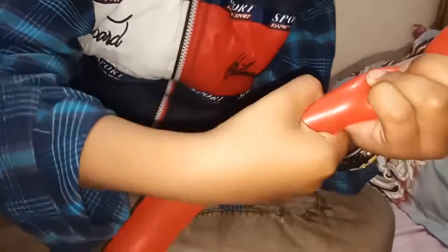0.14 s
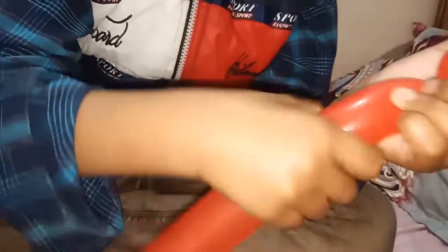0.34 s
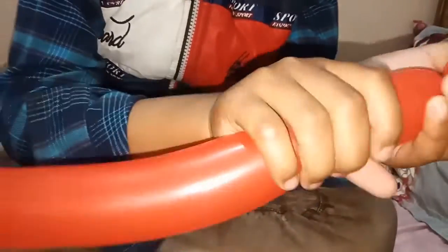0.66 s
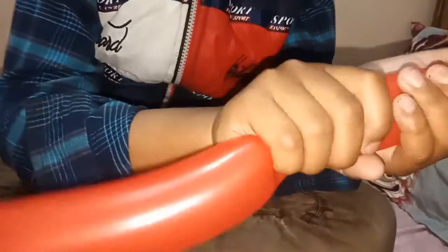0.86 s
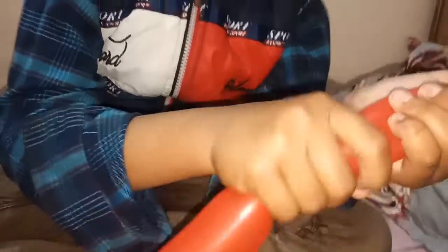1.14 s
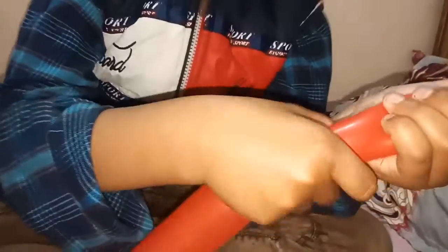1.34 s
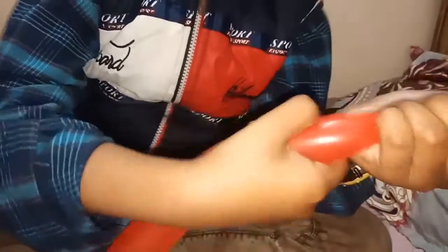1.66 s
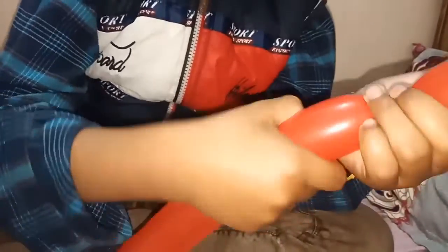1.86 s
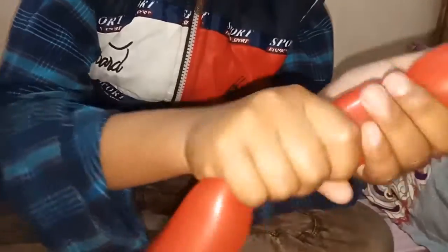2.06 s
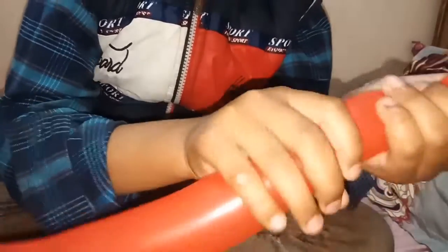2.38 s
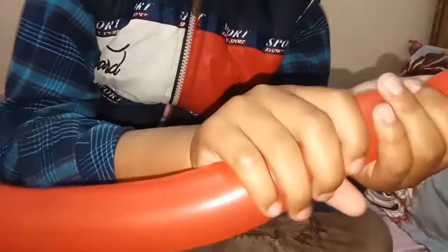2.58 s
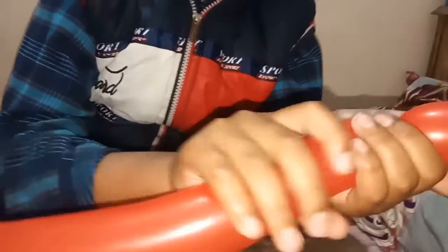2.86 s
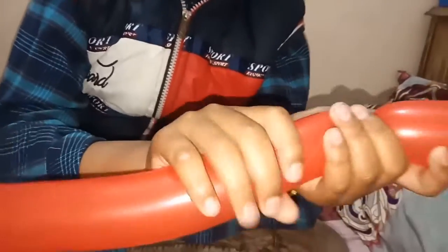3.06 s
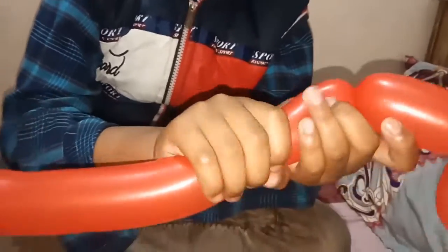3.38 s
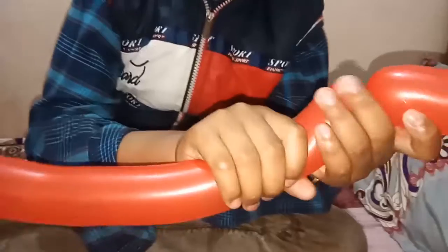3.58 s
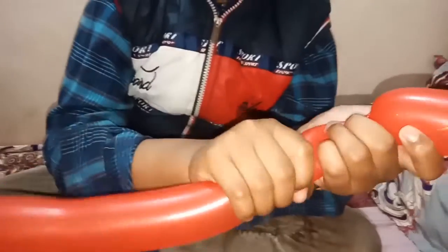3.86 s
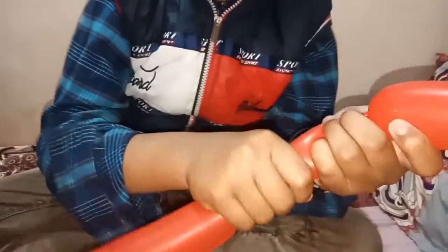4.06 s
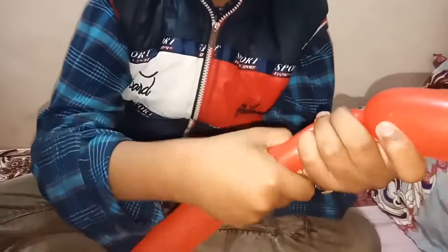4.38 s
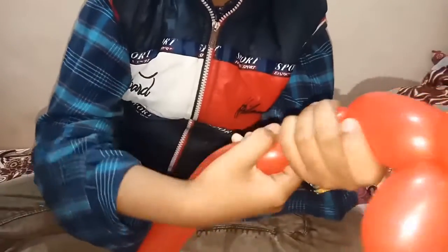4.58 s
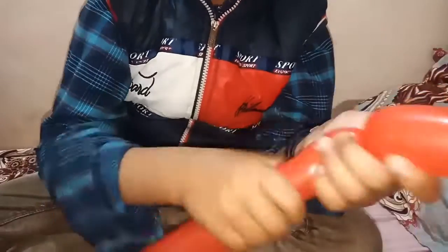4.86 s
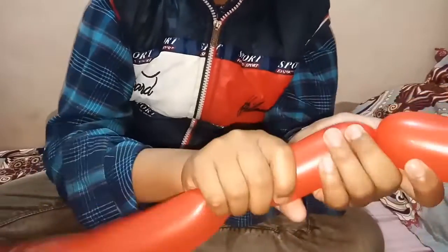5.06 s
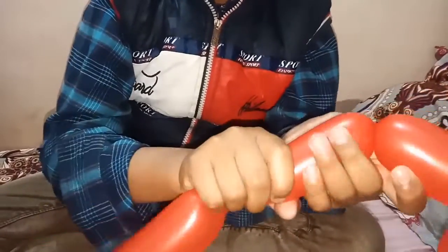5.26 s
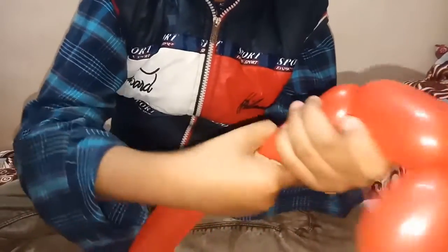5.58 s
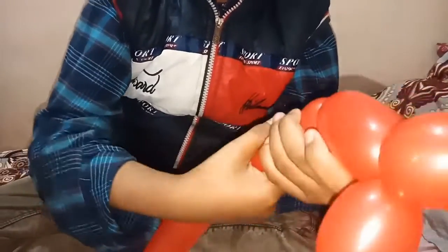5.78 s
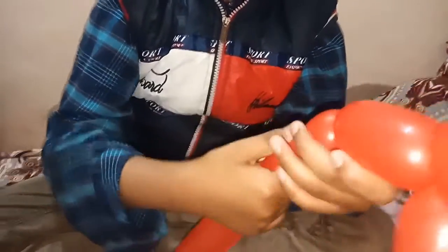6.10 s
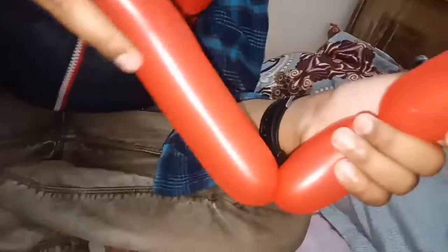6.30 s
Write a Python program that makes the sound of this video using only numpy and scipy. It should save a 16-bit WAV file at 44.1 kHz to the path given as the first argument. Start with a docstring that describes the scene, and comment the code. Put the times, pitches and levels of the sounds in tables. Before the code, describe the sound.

Hands twist a long latex balloon close by: dry cracks, short creaky squeaks, soft crackle and long near-silent gaps in a small furnished room.

```python
"""In a small furnished room, hands twist a latex modelling balloon close to a phone.
The rubber sticks and slips: a lone slip is a dry snap, a slowing run of slips a creak,
an even run a squeak, a scattered run a rub. Tiny stray slips tick and crackle in between.
Each slip is a short damped swing with echoes from the tube and the room.
Underneath are filtered noises: palms brushing, the tube rumbling, the still room and hiss."""
import sys
import numpy as np
from scipy import signal
from scipy.fft import rfft, irfft, next_fast_len
from scipy.io import wavfile
from scipy.ndimage import map_coordinates

SR = 44100
rng = np.random.default_rng(int(sys.argv[2]) if len(sys.argv) > 2 else 0)


def master(y):
    """Save y as 16-bit WAV."""
    cut = np.clip(np.atleast_2d(y).T, -1, 1)
    pcm = np.round(cut * 32767)  # scale
    wavfile.write(sys.argv[1], SR, pcm.astype(np.int16))


N = 283860  # length in samples

# Lone slips: start_s, level_db (peak before trim and echoes), ring_hz
SNAPS = [(0.334, -2, 2550), (0.364, -5, 1650), (0.3665, -6.5, 1600), (0.3751, -3, 2550),
         (0.3815, -11, 1400), (0.405, -18.5, 2020), (0.5419, -31, 970), (0.6169, -27, 1300),
         (0.6258, -24, 1900), (0.6712, -38, 3100), (0.922, -31.5, 3500), (0.9973, -38, 3500),
         (1.1407, -35, 1700), (1.2424, -33, 1300), (1.5161, -36.5, 2500), (1.599, -32, 2100),
         (1.6627, -22.5, 3000), (1.698, -30.5, 750), (1.984, -31.5, 1600), (2.0297, -33, 1610),
         (2.0865, -36, 700), (2.1447, -32.5, 3700), (2.2513, -25.5, 1550), (2.2605, -27.5, 1450),
         (2.282, -9.5, 1860), (2.3095, -6.5, 1900), (2.3305, -5.5, 1800), (2.3473, -8.5, 1500),
         (2.4765, -28, 1600), (2.505, -4, 1870), (2.6789, -27.5, 1700), (2.7878, -33.5, 1700),
         (2.814, -22, 1915), (2.8204, -26.5, 2066), (2.8817, -16, 2100), (3.138, -31.5, 900),
         (3.177, -37.5, 2850), (3.3691, -40.5, 2637), (3.5425, -28.5, 1500), (3.6145, -37.5, 1950),
         (3.743, -38.5, 2520), (4.150, -52.5, 504), (4.553, -19.5, 1500), (4.569, -26.5, 1650),
         (4.6276, -32.5, 1810), (4.9021, -25, 1280), (5.1616, -34.5, 1700), (5.956, -38, 2000),
         (6.1337, -31.5, 1604), (6.2216, -37.5, 3400), (6.3965, -27.5, 1500), (6.4347, -18, 1725)]
# Slowing runs of slips: start_s, length_s, level_db (before the room), first_slips_per_s, first_ring_hz
CREAKS = [(0.361, .075, -36.5, 420, 2200), (1.228, .02, -52, 173, 500), (1.661, 0.047, -36, 229, 1110),
          (2.067, .026, -44, 330, 560), (2.281, .062, -18.5, 520, 2700), (2.311, .052, -18.5, 235, 2300),
          (2.631, .034, -42, 500, 1430), (2.894, .054, -25.5, 448, 2700), (3.110, 0.044, -45, 189, 1750),
          (4.877, .056, -44.5, 410, 1930), (4.903, .055, -42.5, 215, 680), (5.35, 0.031, -51.5, 183, 620),
          (6.122, 0.035, -46.5, 247, 1020), (6.422, 0.038, -39.5, 149, 259)]
# Even runs of slips: start_s, length_s, level_db (before the room), first_pitch_hz, last_pitch_hz, ring_hz
SQUEAKS = [(1.313, 0.029, -50, 1710, 1140, 3000), (1.892, 0.03, -28.5, 770, 880, 1300),
           (1.896, .032, -23.5, 560, 430, 806), (2.491, 0.0094, -35, 923, 760, 1000),
           (2.898, .045, -27, 490, 419.6, 770), (3.780, 0.23, -71, 903, 1003, 1000),
           (4.293, 0.12, -69.5, 590, 579, 700), (5.071, 0.035, -51.5, 460, 520, 1200),
           (5.532, 0.063, -56, 712, 1066, 1790)]
# Fingers sliding over the skin: start_s, rise_s, fall_s, level_db (before the room), ring_hz
RUBS = [(0.079, 0.033, .12, -67, 4010), (0.567, 0.0089, 0.069, -50, 1700),
        (1.229, 0.0085, 0.089, -65, 2940), (1.647, 0.0091, 0.034, -43.5, 3150),
        (1.930, 0.014, 0.069, -51, 1700), (2.826, 0.083, .025, -43, 1800), (3.534, .02, 0.069, -52, 1730),
        (4.440, .15, 0.023, -50.5, 2400), (4.782, 0.062, 0.018, -39.5, 2000),
        (5.060, 0.022, 0.042, -53.5, 2250), (5.400, .15, .24, -63.5, 3200), (5.951, 0.014, 0.02, -47, 1860),
        (5.975, 0.04, 0.08, -54, 1456), (6.392, 0.049, .02, -37, 1450)]
# How busy the hands are: time_s, level_db (before each layer's trim)
HAND_LEVELS = [(0.0, -65.5), (0.37, -64), (0.51, -62), (0.68, -61), (0.98, -64.5), (1.94, -61.5),
               (2.46, -55), (2.64, -66.5), (3.01, -55.5), (3.21, -63.5), (4.28, -67.5), (4.87, -63.5),
               (4.97, -59.5), (5.19, -64), (5.61, -62), (6.4, -72.5)]
# How strongly the handled tube rumbles: time_s, level_db (before trim)
RUMBLE_LEVELS = [(0.0, -70), (0.23, -66), (2.26, -72.5), (2.37, -59), (2.42, -72.5), (4.72, -65.5),
                 (5.35, -58.5), (5.78, -62.5), (5.92, -48.5), (5.95, -61), (6.36, -69), (6.4, -64)]
# Colour of the palms' brushing: frequency_hz, relative_level_db (per Hz)
BRUSH_COLOUR = [(60, -30), (200, -3.5), (700, -4.5), (1600, -4.5), (2600, -9.5), (3800, -11), (4400, -18.5),
                (5200, -31), (6500, -30.5), (9000, -42.5)]
# Colour of the tube's rumble: frequency_hz, relative_level_db (per Hz)
RUMBLE_COLOUR = [(20, -30), (50, -23.5), (88, -2), (125, -11.5), (200, -22), (400, -38), (1000, -84.5)]
# Colour of the still room: frequency_hz, relative_level_db (per Hz)
STILL_ROOM_COLOUR = [(20, -3.5), (50, -6), (85, -1), (200, -1.5), (1000, -10), (2500, -20.5), (3800, -23),
                     (4400, -30), (5200, -34.5), (9000, -35)]
# The phone's colour on the balloon: frequency_hz, gain_db
MICROPHONE_COLOUR = [(40, -21), (180, -5), (550, -4), (1000, -3), (2600, 1), (3700, 9.5), (4250, 2.5),
                     (4700, -6.5), (5300, -10.5), (6300, 1), (7800, -8.5), (10000, -10.5), (15000, -21)]
# Time the room takes to fade by 60 dB: frequency_hz, fade_s
ROOM_FADE = [(150, .27), (600, 0.14), (2000, 0.25), (4000, 0.24), (9000, 0.08)]
# Colour of the room's tail, its bass soaked up by the bedding: frequency_hz, relative_level_db
ROOM_COLOUR = [(200, -5), (500, -2.5), (1200, -0.5), (3500, -3), (9000, -1)]

TOP_HZ = 15500  # band limit

# Slack, low-ringing skin pushes more air; hard snaps are mostly crack, soft ones more push
PUSH_DB, PUSH_AT_HZ, PUSH_DB_PER_OCTAVE, PUSH_DB_PER_SNAP_DB = -29.5, 1730, -13, -0.3
# Damping is a share from 0 to 1; taut, high-ringing skin rings longer
SNAP_DAMPING, DAMPING_PER_OCTAVE = 0.64, -0.1

CREAK_RISE, CREAK_ROUGH = 0.51, 0.56  # share of the length; roughness 0-1
CREAK_SLOWS, CREAK_DULLS = 0.68, 0.53  # last over first slip rate and ring
# Slack skin lets the whole wall swing: level against the slips
WALL_DB, WALL_AT_HZ, WALL_DB_PER_OCTAVE = -3, 1010, -3.5

SQUEAK_RISE, SQUEAK_WALL_DB = 0.53, 0.5  # share of the length; wall level against the slips
SQUEAK_ROUGH = 0.09  # roughness for each multiple of the pitch at which the skin rings

RUB_RATE, RUB_ROUGH, RUB_WALL_DB = 520, 0.88, -30  # slips a second; roughness 0-1; wall against slips

# Faint slips: number, peak over the hand level, its scatter either way, middle ring
STRAY_COUNT, STRAY_DB, STRAY_SPREAD_DB, STRAY_HZ = 40, 16, 3, 2096


def slips(times, gains, ring_hz, damping, size=600):
    """Each slip lets the taut skin spring back in one heavily damped swing."""
    index = np.ceil(times * SR).astype(int)[:, None] + np.arange(size)
    turn = 2 * np.pi * ring_hz[:, None] * (index / SR - times[:, None])
    angle = np.arccos(np.clip(damping, 0.08, 0.9))
    decay = np.exp(-turn * np.cos(angle))
    swing = turn ** 2 * decay * np.sin(3 * angle - turn * np.sin(angle))
    return np.bincount(index.ravel(), (gains[:, None] * swing).ravel())


def snaps(push_hz=480, push_spread_db=2, level_db=-1, chatter=0.53, chatter_s=0.0015, count=5):
    """A lone slip cracks the skin, chatters as it grips again and gives the enclosed air a low push."""
    out = np.zeros(N)
    for start_s, db, ring_hz in SNAPS:
        octaves = np.log2(ring_hz / PUSH_AT_HZ)
        # the first slip, then the weaker chatter
        times = np.append(0, rng.exponential(chatter_s, count))
        sizes = np.append(1, chatter * rng.uniform(-0.76, 1, count))
        rings = ring_hz * np.exp(np.append(0, 0.44 * rng.standard_normal(count)))
        crack = slips(times, sizes, rings, SNAP_DAMPING + DAMPING_PER_OCTAVE * octaves)
        snap = crack / np.abs(crack).max()
        push = slips(np.zeros(1), np.ones(1), np.array([push_hz]), damping=0.9)
        push_db = PUSH_DB + PUSH_DB_PER_OCTAVE * octaves + PUSH_DB_PER_SNAP_DB * db
        push_db += push_spread_db * rng.standard_normal()
        add(snap, 0, amp(push_db) * push / np.abs(push).max())
        in_tube = tube(snap, echo=0.23, reach_s=0.003983)
        add(out, start_s, amp(db + level_db) * room(in_tube, wet_db=-15.5))
    return out


def slip_run(rise, fall, rates, rings, rough, wall_db, scatter=0.2253, size_db=4, tear_db=0, count=6):
    """One run of stick and slip; the rougher the grip, the more uneven its slips."""
    t = np.arange(int((rise + fall) * SR)) / SR
    rough = np.clip(rough, 0, 1)
    rate = np.linspace(*rates, len(t)) * np.exp(0.04 * wobble(180, len(t)))
    cycles = np.cumsum(rate) / SR
    whole = np.arange(int(cycles[-1]) + 1)
    uneven = whole + scatter * rough * rng.standard_normal(len(whole))
    times = np.interp(uneven, cycles, t)  # one slip per cycle
    ring_curve = np.geomspace(*rings, len(t))

    def ring_at(when, spread):
        """The skin's ring at these times, varied at random from slip to slip."""
        vary = np.exp(spread * rng.uniform(-1.036, 1, len(when)))
        return ring_curve[(when * SR).astype(int)] * vary

    sizes = amp(size_db * rough * rng.standard_normal(len(times)))
    main = slips(times, sizes, ring_at(times, spread=0.99 * rough), damping=0.72)

    # patches of the contact tear loose one after another behind each main slip
    delays = rng.exponential(0.45 / np.mean(rates), len(times) * count)
    late = np.minimum(np.repeat(times, count) + delays, t[-1])
    tear_sizes = amp(tear_db) * rough * rng.uniform(-1.49, 1.28, len(late))
    tears = slips(late, tear_sizes, ring_at(late, spread=0.6), damping=0.57)

    skin = np.zeros(len(t))
    add(skin, 0, main)
    add(skin, 0, tears)

    # the whole wall swings lopsidedly at the slip rate
    phase = 2 * np.pi * cycles
    wall = unit(np.sin(phase) + 0.34 * np.sin(2 * phase))
    in_tube = tube(skin, echo=0.28, reach_s=0.004)[:len(t)]
    voice = unit(in_tube) + amp(wall_db) * wall

    pressure = np.sin(np.interp(t, [0, rise, rise + fall], [0, np.pi / 2, np.pi]))
    return voice * np.abs(pressure) ** 0.84


def creaks():
    """As a twist gives way the tension drains: the slips slow down and the skin rings lower."""
    out = np.zeros(N)
    for start_s, length, db, rate, ring_hz in CREAKS:
        wall_db = WALL_DB + WALL_DB_PER_OCTAVE * np.log2(ring_hz / WALL_AT_HZ)
        rates = (rate, rate * CREAK_SLOWS)
        rings = (ring_hz, ring_hz * CREAK_DULLS)
        run = slip_run(length * CREAK_RISE, length * (1 - CREAK_RISE), rates, rings,
                       CREAK_ROUGH, wall_db, scatter=0.26, size_db=5, tear_db=-2)
        add(out, start_s, amp(db) * room(run, wet_db=-14.0))
    return out


def squeaks():
    """The slips lock into a tone, cleanest where the skin rings close to their rate."""
    out = np.zeros(N)
    for start_s, length, db, first_hz, last_hz, ring_hz in SQUEAKS:
        rough = SQUEAK_ROUGH * ring_hz / first_hz
        run = slip_run(length * SQUEAK_RISE, length * (1 - SQUEAK_RISE), (first_hz, last_hz),
                       (ring_hz, ring_hz), rough, SQUEAK_WALL_DB)
        add(out, start_s, amp(db) * room(run, wet_db=-14.5))
    return out


def rubs():
    """Sliding fingers scatter quick slips with hardly any pitch."""
    out = np.zeros(N)
    for start_s, rise, fall, db, ring_hz in RUBS:
        run = slip_run(rise, fall, (RUB_RATE, RUB_RATE), (ring_hz, ring_hz),
                       RUB_ROUGH, RUB_WALL_DB, scatter=0.3, size_db=7, tear_db=-1.5)
        add(out, start_s, amp(db) * room(run, wet_db=-16.0))
    return out


def strays():
    """Now and then a fingertip lets go faintly, louder while the hands are busy."""
    out = np.zeros(N)
    busy_db = curve(HAND_LEVELS)
    for place, size, pitch in rng.uniform(0, 1, (STRAY_COUNT, 3)):
        ring_hz = STRAY_HZ * 2 ** (pitch - 0.5)
        tick = slips(np.zeros(1), np.ones(1), np.array([ring_hz]), SNAP_DAMPING)
        db = busy_db[int(place * N)] + STRAY_DB + STRAY_SPREAD_DB * (2 * size - 1)
        in_tube = tube(tick / np.abs(tick).max(), echo=0.38, reach_s=0.0039)
        add(out, place * N / SR, amp(db) * in_tube)
    return room(out, wet_db=-11)[:N]


def crackle(level_db=-6, spread_db=5.0, ring_hz=2400, count=900):
    """A fine grain of tiny stray slips under the fingers, following the brushing."""
    times = rng.uniform(0, N / SR, count)
    sizes = amp(spread_db * np.minimum(rng.exponential(1, count), 3))
    rings = ring_hz * np.exp(0.62 * rng.standard_normal(count))
    ticks = slips(times, sizes, rings, damping=0.57)
    in_tube = tube(ticks, echo=0.56, reach_s=0.0047)
    return room(in_tube, wet_db=-7.5)[:N] * amp(curve(HAND_LEVELS) + level_db)


def tube(x, echo, reach_s, count=9):
    """Waves run along the balloon and return within milliseconds, differently for every grip."""
    delay = rng.uniform(0.072, 1, count)  # share of the longest return time
    lags = np.append(0, delay * reach_s * SR).astype(int)
    gains = np.append(1, echo * rng.choice([-1, 1], count) * np.exp(-1.4 * delay))
    return np.convolve(x, np.bincount(lags, gains))


def room(x, wet_db, gap_s=0.006):
    """The direct sound, then a new random tail that fades at its own pace in each band."""
    hz, t, z = signal.stft(rng.standard_normal(SR // 3), SR, nperseg=256)
    fade_db = along(ROOM_COLOUR, hz)[:, None] - 60 * t / along(ROOM_FADE, hz)[:, None]
    tail = signal.istft(z * amp(fade_db), SR, nperseg=256)[1]
    tail = amp(wet_db) * tail / np.linalg.norm(tail)
    response = np.pad(tail, (int(gap_s * SR) + 1, 0))
    response[0] = 1  # direct sound
    return signal.fftconvolve(x, response)


def microphone(x, size=4096):
    """The phone colours the sound without ringing ahead of it; treble drops steeply above a peak."""
    log_gain = np.log(amp(along(MICROPHONE_COLOUR, np.fft.rfftfreq(size, 1 / SR))))
    cepstrum = irfft(log_gain)
    # folding onto positive times makes the filter act only after each sound
    fold = np.concatenate([[1], np.full(size // 2 - 1, 2), np.zeros(size // 2)])
    response = irfft(np.exp(rfft(cepstrum * fold)))
    return signal.fftconvolve(x, response)[:N]


def brushing(level_db=-3):
    """Palms brush the skin: coloured noise that follows the hands and wavers slightly."""
    return amp(curve(HAND_LEVELS) + level_db + 1.4 * wobble(19, N)) * noise(BRUSH_COLOUR)


def rumble(level_db=-1):
    """The handled tube rumbles: low noise that swells and sinks."""
    return amp(curve(RUMBLE_LEVELS) + level_db) * noise(RUMBLE_COLOUR)


def still_room(level_db=-67):
    """The quiet room: steady noise, strongest in the bass and lower middle."""
    return amp(level_db) * noise(STILL_ROOM_COLOUR)


def hiss(level_db=-81):
    """The microphone's own hiss: even noise at all pitches."""
    return amp(level_db) * rng.standard_normal(N)


def amp(db):
    """Decibels to gain."""
    return 10 ** (np.asarray(db) / 20)


def unit(x):
    """x scaled to an rms (average strength) of 1."""
    return x / np.sqrt(np.mean(x ** 2) + 1e-20)


def along(points, hz):
    """(frequency, value) points read on a log frequency axis."""
    f, v = np.transpose(points)
    return np.interp(np.log(hz + 1), np.log(f + 1), v)


def curve(rows):
    """(time, value) rows as one value per sample."""
    return np.interp(np.arange(N) / SR, *np.transpose(rows))


def wobble(rate, size):
    """A smooth random curve with this many random points a second."""
    points = rng.standard_normal(int(size * rate / SR) + 4)
    return map_coordinates(points, [np.arange(size) * rate / SR])


def noise(colour):
    """Noise of rms 1 with the given colour."""
    gain = amp(along(colour, np.fft.rfftfreq(N, 1 / SR)))
    return unit(irfft(rfft(rng.standard_normal(N)) * gain, N))


def add(track, start_s, x):
    """Mix x into track from this time, cutting what runs past the end."""
    part = track[max(round(start_s * SR), 0):][:len(x)]
    part += x[:len(part)]


def scene():
    """The balloon through the phone's microphone, plus the quiet background."""
    balloon = snaps() + strays() + creaks() + squeaks() + rubs() + crackle()
    background = brushing() + rumble() + still_room() + hiss()
    return (microphone(balloon) + background)[None]


def record(dry):
    """Nothing is kept above the band limit."""
    size = next_fast_len(N + SR // 2)  # spare room so the end does not wrap to the start
    keep = np.fft.rfftfreq(size, 1 / SR) < TOP_HZ
    return irfft(rfft(dry, size) * keep, size)[:, :N]


dry = scene()
out = record(dry)
master(out)
```